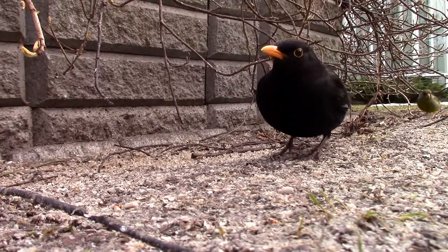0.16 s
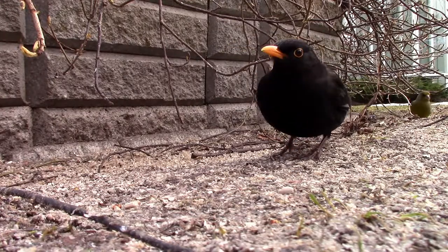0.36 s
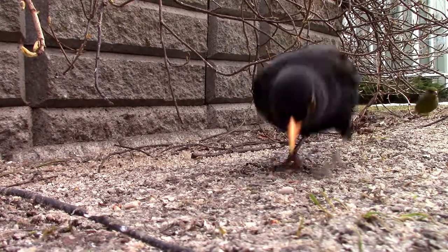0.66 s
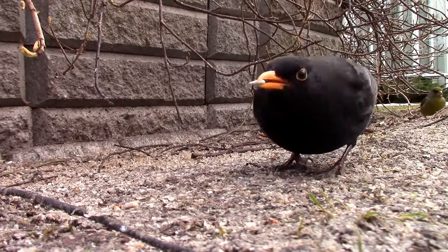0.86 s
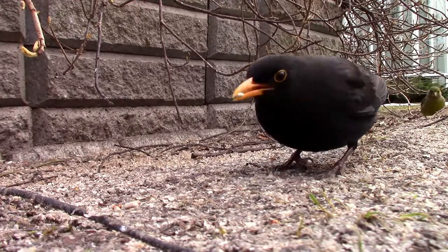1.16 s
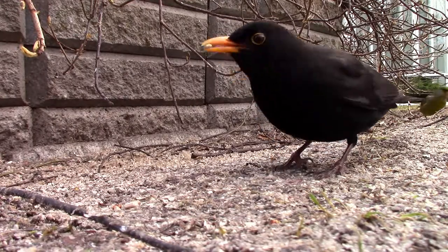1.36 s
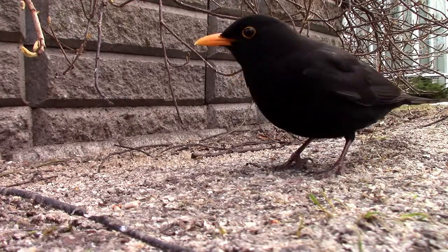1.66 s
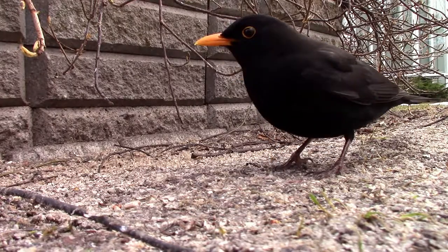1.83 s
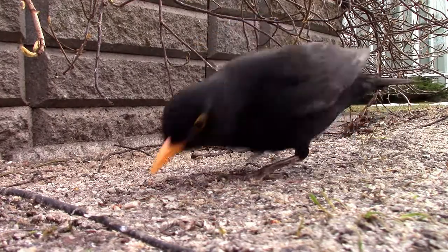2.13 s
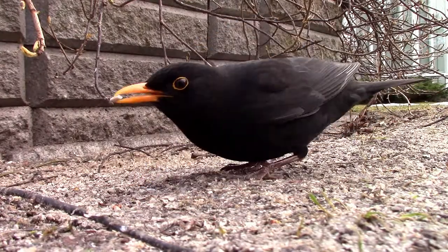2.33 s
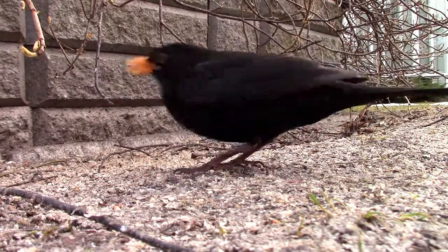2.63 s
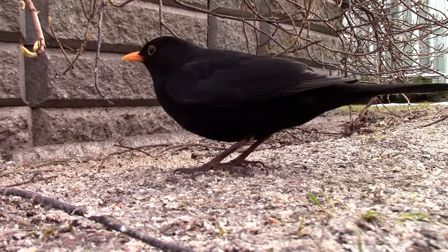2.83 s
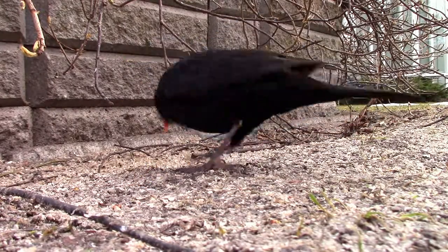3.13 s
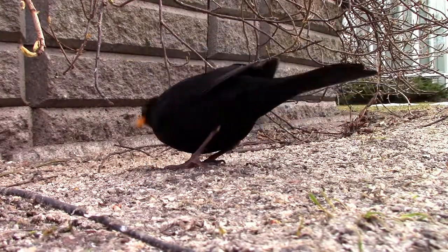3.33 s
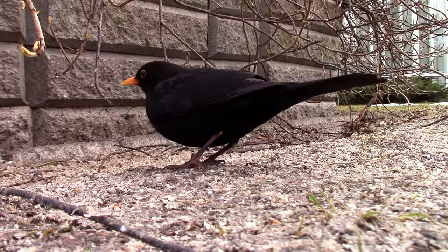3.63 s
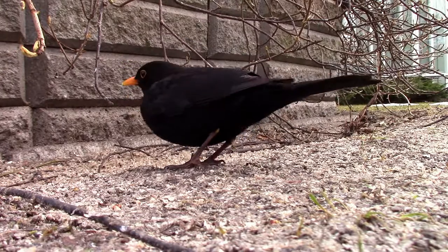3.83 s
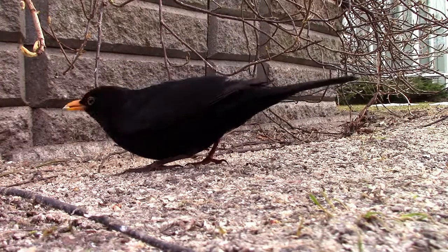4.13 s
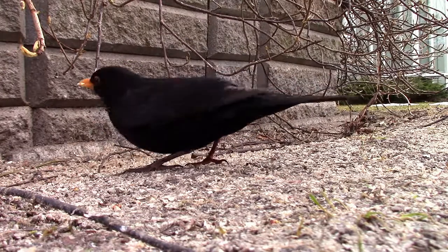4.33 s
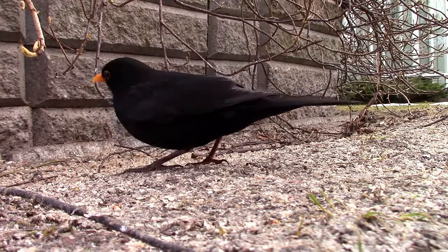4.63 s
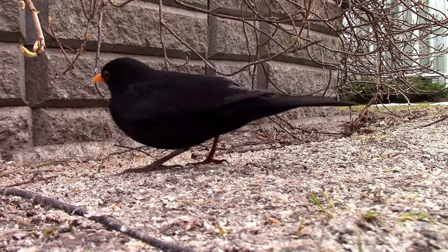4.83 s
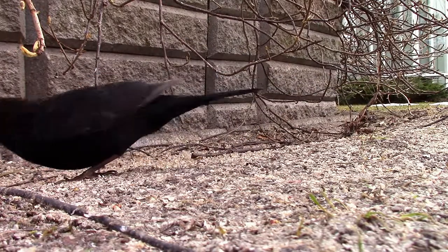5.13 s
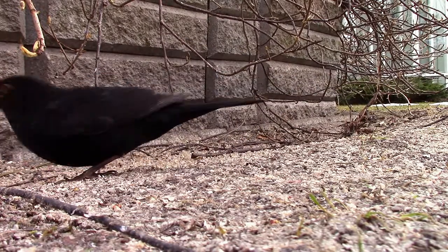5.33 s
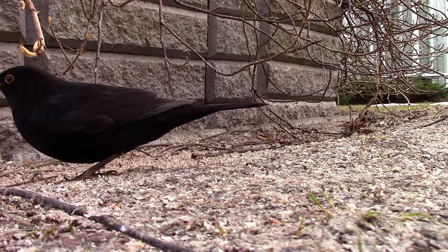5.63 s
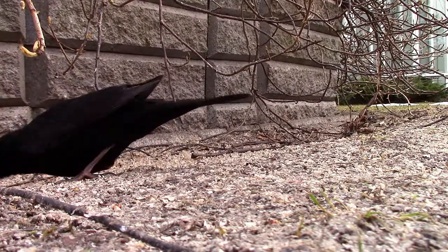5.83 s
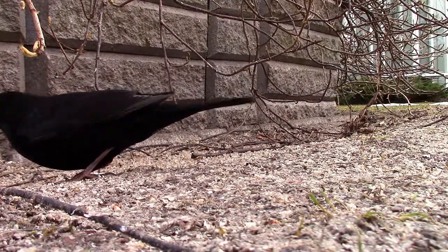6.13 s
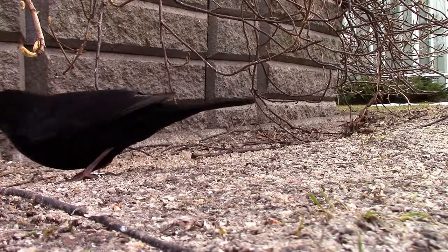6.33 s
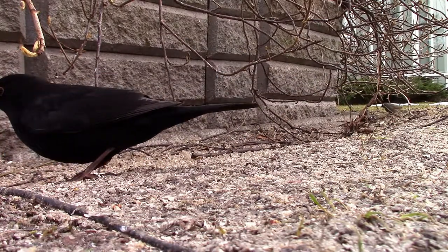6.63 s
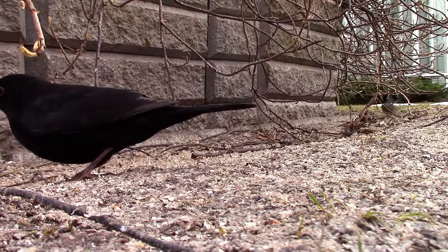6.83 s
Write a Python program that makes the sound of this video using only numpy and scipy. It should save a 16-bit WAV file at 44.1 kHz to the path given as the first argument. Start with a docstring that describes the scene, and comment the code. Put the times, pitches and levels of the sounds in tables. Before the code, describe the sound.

Outdoor yard beside a stone wall, with a close stereo microphone. Dry, hard beak clicks stand out over a quiet low rumble and wavering engine drone. Fast bird song opens, chips and thin whistles follow, and the song briefly returns late. Midway there is a rapid wing flurry, gravel crunches and the sharp snap of a husk; small scuffs, ticks and pecks continue to the end.

```python
"""A blackbird feeds on gravel by a stone wall, close by: beak snaps and pecks are impulses through damped modes.
Grit clicks and crunches are grains of noise ringing the gravel; cracking husks are short bright noise fizzes.
A songbird across the yard sings two phrases, a nearer one chips and trills, others whistle, rasp and chatter
far off: all gliding tones with yard echoes. Out of sight, wings flutter as swishes and puffs of shaped noise.
A distant engine hums as one sine over the resonant noise rumble of a town and an even hiss."""
import sys
import numpy as np
from scipy import signal
from scipy.fft import rfft, irfft, next_fast_len
from scipy.io import wavfile
from scipy.ndimage import uniform_filter1d

SR = 44100
rng = np.random.default_rng(int(sys.argv[2]) if len(sys.argv) > 2 else 0)


def log_audio(samples):
    """Write samples as a 16-bit WAV file to the path given in sys.argv[1]."""
    # one column per channel
    frames = np.atleast_2d(samples).T
    # limit to full scale, then quantise
    limited = np.clip(frames, -1, 1)
    pcm = np.round(limited * 32767).astype(np.int16)
    wavfile.write(sys.argv[1], SR, pcm)


N = 307509
T = np.arange(N) / SR


def undb(db):
    """Decibels to gain."""
    return 10 ** (np.asarray(db) / 20)


def unit(x):
    """Scale to rms 1."""
    return x / np.sqrt(np.mean(x ** 2))


def add(out, s, x):
    """Mix x in at time s."""
    i = max(int(s * SR), 0)
    out[..., i:i + x.shape[-1]] += x[..., :N - i]


def band(x, hz, width):
    """One resonance, gain 1 at its centre; centre and width are capped for the filter."""
    hz = min(hz, SR * .45)
    width = min(width, SR / 4)
    return signal.lfilter(*signal.iirpeak(hz, hz / width, fs=SR), x)


def steep(x, hz, width):
    """The same resonance twice, for steeper skirts."""
    return band(band(x, hz, width), hz, width)


def noise(side_db):
    """Stereo noise with a shared middle and a side at side_db relative to it."""
    mid, side = rng.standard_normal((2, N))
    return mid + undb(side_db) * np.array([side, -side])


def colour(x, points):
    """Shape x by a spectrum of (f/Hz, level/dB) points; rms 1."""
    hz, db = np.transpose(points)
    size = next_fast_len(N, True)
    f = np.fft.rfftfreq(size, 1 / SR)
    gain = undb(np.interp(np.log(f + 1), np.log(hz + 1), db))
    return unit(irfft(rfft(x, size) * gain)[..., :N])


def walk(rate):
    """Smooth random wander of spread near 1, from rate random steps a second."""
    k = int(SR / rate)
    steps = np.repeat(rng.standard_normal(N // k + 1), k)
    return 1.3 * uniform_filter1d(uniform_filter1d(steps, k), k)[:N]


def yard(x, echo_s, echo_db, wet_db, t60):
    """Direct sound, an echo off a house front, and a diffuse tail that falls 60 dB in t60 seconds."""
    t = T[:SR]
    own = rng.standard_normal((2, SR))
    tail = (own + 0.1 * own[::-1]) * undb(-60 * t / t60)
    response = undb(wet_db) * unit(tail) / np.sqrt(SR)
    response[:, int(echo_s * SR)] += undb(echo_db)
    return x + signal.fftconvolve(np.atleast_2d(x), response, axes=1)[:, :N]


def notes(table, arch, waver, edge=.07):
    """Nearly pure tones, each gliding between two pitches along an arch and wavering a little."""
    out = np.zeros(N)
    drift = 1 + waver * walk(700)
    for s, length, first, last, db in table:
        # the fades reach past both ends of the listed length by the share edge
        u = np.linspace(-edge, 1 + edge, int(length * (1 + 2 * edge) * SR))
        glide = first * (last / first) ** u
        bend = 1 + arch * (1 - (2 * u - 1) ** 2)
        hz = glide * bend * np.roll(drift, -int(s * SR))[:len(u)]
        tone = np.sin(2 * np.pi * np.cumsum(hz) / SR)
        add(out, s - edge * length, undb(db) * signal.windows.tukey(len(u), .45) * tone)
    return out


def town(rumble_db=-2.0, air_db=-59):
    """One engine note swells and fades over a low resonant rumble and an even hiss."""
    # engine pitch, sinking slowly: t/s, f/Hz
    hum_pitch = [(0, 110.3), (2.7, 107.2), (6.97, 106.6)]
    # engine loudness: t/s, level/dB
    hum_level = [(0.35, -49.5), (1.12, -37), (2.52, -35.5), (3.75, -48), (4.02, -62), (4.39, -67),
                 (4.66, -46.5), (5.39, -44.5), (5.55, -59.5), (6.29, -45), (6.68, -59), (6.97, -56)]
    # rumble loudness before its trim: t/s, level/dB
    rumble_level = [(0, -49), (2.1, -45), (4.4, -49.5), (6.97, -49)]
    # rumble resonances: f/Hz, width/Hz of each filter pass, level/dB
    rumble_modes = [(83.7, 45.4, -1.5), (138.1, 31, 0.5), (175.6, 22.2, -5), (213.8, 21.8, -8),
                    (243.6, 18.6, -8.5), (282, 104, -15), (455.5, 69, -20)]
    # spectrum of the hiss: f/Hz, relative level/dB
    air_colour = [(30, -7), (150, -6.5), (330, -11.5), (600, -9), (1200, -13.5), (2400, -23), (4200, -20),
                  (6000, -26.5), (15800, -28.5)]
    phase = 2 * np.pi * np.cumsum(np.interp(T, *np.transpose(hum_pitch))) / SR
    hum = np.sqrt(2) * np.sin(phase) * undb(np.interp(T, *np.transpose(hum_level)))
    rumble = 0
    for hz, width, db in rumble_modes:
        # long waves reach both sides alike; shorter ones differ
        side_db = min(-21 + 11 * np.log2(hz / 110), -6)
        rumble = rumble + undb(db) * unit(steep(noise(side_db), hz, width))
    rumble = rumble * undb(np.interp(T, *np.transpose(rumble_level)) + rumble_db)
    air = colour(noise(-2.35), air_colour) * undb(air_db + .5 * walk(3.24))
    return hum + rumble + air


def chatter(chatter_db=-2):
    """Far birds: many quick random chirps, rising or falling, blurred by the yard."""
    # loudness of the far birds before the trim: t/s, level/dB
    chatter_level = [(0, -70.5), (1.05, -55.5), (1.7, -64.5), (3.7, -61.5), (4.35, -57.5), (6.1, -64.5)]
    when, length, pitch, slope = rng.random((900, 4)).T
    start = .02 + when * (T[-1] - .1)
    hz = 1400 * 2 ** (1.4 * pitch)
    glide = 0.2 * (slope - .6)
    calls = np.transpose([start, .015 + .02 * length, hz * (1 - glide), hz * (1 + glide), 0 * hz])
    blur = yard(notes(calls, arch=0, waver=0.021), echo_s=0.03, echo_db=-12.0, wet_db=3, t60=0.8)
    return unit(blur) * undb(np.interp(T, *np.transpose(chatter_level)) + chatter_db)


def beak(table, knock_db, rattle_db, rattle_s, sparkle_db, edge_db, hollow_db=-15, ring_db=-19,
         lead_s=0.001194, lift_db=1.0):
    """Each blow is one sharp impulse and a brief rattle, ringing heavily damped resonances."""
    # modes of a blow: knock, hollow of the beak, edge, sparkle: f/Hz, width/Hz (band caps the widest)
    beak_modes = [(1200, 890), (3200, 1900), (7700, 4800), (12500, 22300)]
    out, t = np.zeros((2, N)), T[:1024]
    tick = (t == 0) * 1.
    for s, db, hz, bright in table:
        shares = undb([knock_db, hollow_db, bright + edge_db, bright + sparkle_db])
        ring = sum(share * unit(steep(tick, *mode)) for share, mode in zip(shares, beak_modes))
        ring = ring + undb(ring_db) * unit(steep(tick, hz, 1080))
        shared, left, right = rng.standard_normal((3, len(t)))
        rattle = shared + 3.2 * np.array([left, right])
        rattle = rattle * (1 - np.exp(-t / 0.00041)) * np.exp(-t / rattle_s)
        force = tick + undb(rattle_db) * unit(rattle) / np.sqrt(len(t))
        blow = signal.fftconvolve(force, ring[None] / abs(ring).max(), axes=1)
        add(out, s + lead_s, undb(db + lift_db) * blow)
    return yard(out, echo_s=0.023, echo_db=-30.0, wet_db=-27.5, t60=0.11)


def feeding():
    """Snaps in the air are dry and clean; pecks at the gravel knock and rattle more strongly."""
    # beak snapping shut, before beak's lead and lift: t/s, level/dB, ring f/Hz, brightness level/dB
    snap_table = [(0.0198, -29.5, 2750, -18.5), (0.0449, -11, 3080, -16), (0.1986, -32, 2670, -36),
                  (1.2606, -24, 3580, -20), (1.2638, -22, 2950, -18.5), (1.6295, -27, 3350, -19),
                  (1.699, -30, 3550, -14.5), (2.3731, -21.5, 2850, -16.5), (2.6204, -22.5, 2900, -4),
                  (2.6228, -25, 3960, -54), (3.6195, -29.5, 3000, -13), (3.6262, -20, 3430, -13),
                  (4.1815, -36, 3600, -36), (4.1888, -29, 3770, -18), (4.1999, -10.5, 3100, -10.5),
                  (4.3969, -35.5, 2510, -26), (5.2225, -23, 2540, -21), (6.0538, -26.5, 2630, -17.5),
                  (6.2619, -32.5, 3640, -24)]
    # beak striking the gravel, before beak's lead and lift: t/s, level/dB, ring f/Hz, brightness level/dB
    peck_table = [(0.9011, -24, 2660, -24), (3.432, -25.5, 2945, -20), (5.0613, -35.5, 2720, -21.5),
                  (5.4516, -31.5, 2400, -16), (6.3303, -31.5, 3850, -22)]
    snaps = beak(snap_table, knock_db=-27.5, rattle_db=-7.5, rattle_s=0.0021, sparkle_db=-4.5, edge_db=2.0)
    pecks = beak(peck_table, knock_db=-20.0, rattle_db=-0.5, rattle_s=0.0019, sparkle_db=1, edge_db=3)
    return snaps + pecks


def syllables(shape, table):
    """The notes of one kind of syllable, sung at each row's time, pitch and strength."""
    sung = []
    for s, hz, db in table:
        for delay, length, first, last, accent in shape:
            sung.append((s + delay, length, hz * first, hz * last, db + accent))
    return sung


def singer(song_db=-2, buzz_db=-4):
    """The song comes round the wall by many short paths, which smear its notes, and lingers in the yard."""
    # notes of the two kinds of syllable: delay/s, length/s, first and last share of the row's pitch, accent/dB
    tumble_shape = [(-.015, .015, 1.42, 1.26, -14.5), (0, 0.034, 0.98, 0.84, 0.5),
                    (.036, .026, .84, .75, -3)]
    peak_shape = [(0, 0.0293, .77, 1, 0), (.029, .02, .98, .63, -1)]
    # when each kind is sung: t/s, reference f/Hz, level/dB
    tumbles_sung = [(.064, 4250, -53.5), (0.225, 3980, -49.5), (0.381, 3850, -50.5), (.534, 3830, -49.5)]
    peaks_sung = [(.728, 4100, -49), (.925, 4100, -46.5), (4.711, 3800, -53.5), (4.772, 4000, -50),
                  (4.955, 3750, -50.5)]
    # single quick notes between them: t/s, first f/Hz, last f/Hz, level/dB
    twitters = [(.483, 3422, 4500, -52.5), (.634, 3280, 4440, -55), (.675, 3720, 2400, -51),
                (1.068, 4450, 5800, -57), (4.23, 3200, 2810, -50), (4.266, 4160, 3280, -52),
                (4.403, 3810, 3430, -55), (4.441, 2970, 3720, -54), (4.559, 2960, 4070, -49)]
    # long buzzy sweeps: t/s, length/s, first f/Hz, last f/Hz, level/dB
    buzzes = [(1.112, .112, 5764, 2646, -46.5), (1.32, 0.066, 2510, 4200, -49.5),
              (1.383, 0.046, 4240, 3200, -48), (5.155, 0.12, 5000, 2390, -52),
              (5.35, 0.056, 2640, 4140, -53), (5.405, 0.051, 4030, 3140, -52.5)]
    # low, hoarse notes under the first phrase: t/s, length/s, first f/Hz, last f/Hz, level/dB
    chuckles = [(.852, .02, 2650, 2540, -51), (0.872, 0.21, 1660, 1526, -54),
                (1.003, 0.036, 2800, 2650, -54)]
    twitter_s = 0.015
    song = syllables(tumble_shape, tumbles_sung) + syllables(peak_shape, peaks_sung)
    song = song + [(s, twitter_s, *note) for s, *note in twitters]
    # a negative arch lets each clear note dip below its even glide halfway through
    clear = undb(song_db) * notes(song, arch=-0.041, waver=.02)
    # a strong shake of the pitch makes the buzz
    rough = undb(buzz_db) * notes(buzzes + chuckles, arch=0, waver=0.052)
    paths = yard(clear, echo_s=.009, echo_db=-9, wet_db=-3, t60=.11)
    paths = paths + yard(rough, echo_s=.012, echo_db=-6, wet_db=0, t60=.13)
    return yard(paths, echo_s=.038, echo_db=-15, wet_db=-7, t60=.8)


def grit():
    """Tiny stones click against each other: in clusters at each scuff, and singly in between."""
    # grit shifting under feet and beak, before the ring: t/s, length/s, level/dB
    scuffs = [(1.607, 0.019, -58), (2.667, 0.0033, -54.5), (3.4262, 0.005, -48.5), (5.443, 0.028, -55),
              (6.264, 0.0053, -49)]
    # one small stone on another, before the ring: t/s, level/dB
    clicks = [(.369, -35.5), (3.6775, -31.5), (4.5017, -37), (4.5575, -34), (5.9429, -36), (6.04, -34)]
    out = np.zeros(N)
    for s, length, db in scuffs:
        n = int(length * SR)
        grains = rng.standard_normal(n) * undb(5 * np.minimum(rng.exponential(size=n), 4))
        add(out, s, undb(db) * unit(grains * np.hanning(n)))
    for s, db in clicks:
        add(out, s, undb([db]))
    return 2.9 * steep(out, 3050, 3800) + 1.8 * steep(out, 5500, 12000)


def crunches(grain_db=6, rise_s=0.0019):
    """Dull crunches, as of steps: each presses a burst of uneven grains that ring the gravel bed."""
    # crunches before the ring: t/s, level/dB
    steps = [(0.821, -52), (3.937, -53), (3.982, -51), (4.146, -47), (4.181, -48), (4.229, -49),
             (5.062, -50), (5.316, -49), (5.474, -49.5), (5.51, -42.5), (5.624, -50)]
    # resonances of the gravel bed: f/Hz, width/Hz of each filter pass, level/dB
    bed_modes = [(910, 690, 3), (1430, 500, 0.5), (3200, 4000, -6)]
    out, t = np.zeros(N), T[:SR // 10]
    for s, db in steps:
        unevenness = np.minimum(rng.exponential(size=len(t)), 4)
        grains = unit(rng.standard_normal(len(t)) * undb(grain_db * unevenness))
        add(out, s, undb(db) * grains * t / rise_s * np.exp(1 - t / rise_s))
    # narrow modes are lifted, as they pass less of the noise
    return sum(undb(db) * np.sqrt(SR / 2 / width) * steep(out, hz, width) for hz, width, db in bed_modes)


def near_bird(count=5):
    """Slurs, chips, loops and arches, close and fairly dry, and a quick sinking trill of merging notes."""
    # slurs: t/s, length/s, first f/Hz, last f/Hz, level/dB
    slurs = [(2.32, 0.043, 2300, 2520, -54.5), (3.57, 0.032, 4250, 5200, -53.5),
             (3.978, 0.04, 4680, 3340, -44.5), (4.016, 0.039, 3350, 3010, -42),
             (5.628, 0.039, 4050, 4780, -60.5), (5.664, 0.079, 4860, 4590, -55),
             (5.712, 0.15, 4600, 3975, -46.5)]
    # short falling chips: t/s, level/dB; their note: length/s, first f/Hz, last f/Hz
    chip_table = [(3.088, -53), (3.162, -43), (3.251, -43), (4.073, -53)]
    chip_note = (0.0163, 3650, 3180)
    # quick up-and-down loops: t/s, level/dB; their note: length/s, first f/Hz, last f/Hz
    loop_table = [(3.33, -59.5), (3.458, -56), (3.599, -51), (3.739, -51), (3.88, -54.5)]
    loop_note = (0.02, 3400, 3350)
    # lower, slower arches: t/s, level/dB; their note: length/s, first f/Hz, last f/Hz
    arch_table = [(4.472, -61), (4.59, -58), (4.706, -59)]
    arch_note = (.044, 2100, 1800)
    # first rising note of the trill: length/s, first f/Hz, last f/Hz
    trill_note = (0.024, 4100, 5200)
    trill_s, step_s, trill_db = 3.752, 0.027, -52.5
    sink_hz = 82  # each trill note starts and ends this much lower
    chips = [(s, *chip_note, db) for s, db in chip_table]
    loops = [(s, *loop_note, db) for s, db in loop_table]
    loops = loops + [(s, *arch_note, db) for s, db in arch_table]
    length, first, last = trill_note
    run = [(trill_s + k * step_s, length, first - k * sink_hz, last - k * sink_hz, trill_db)
           for k in range(count)]
    trill = yard(notes(run, arch=.025, waver=.014), echo_s=.013, echo_db=-12, wet_db=-7, t60=.4)
    voice = notes(slurs, arch=-0.0167, waver=0.0051)
    voice = voice + notes(chips, arch=0.028, waver=0.019)
    voice = voice + notes(loops, arch=0.33, waver=0.0063) + trill
    return yard(voice, echo_s=.024, echo_db=-14, wet_db=-10, t60=.8)


def whistlers():
    """Whistles from far off, each a shallow arch and some two-voiced, that linger in the yard."""
    # whistles: t/s, length/s, first f/Hz, last f/Hz, level/dB
    whistles = [(2.869, 0.089, 1927, 1950, -56.5), (2.97, 0.056, 2010, 2170, -60),
                (2.966, 0.064, 3200, 3340, -58.5), (3.108, 0.086, 1952, 1907, -57),
                (3.331, 0.063, 2036, 1880, -57), (3.59, 0.11, 4036, 4200, -51),
                (3.91, 0.062, 2130, 1975, -58), (4.325, 0.14, 2270, 2180, -57),
                (5.125, 0.15, 1950, 2125, -57), (6.13, 0.084, 2130, 2145, -61),
                (6.134, 0.074, 2610, 2590, -62), (6.33, 0.082, 4030, 4090, -68),
                (6.58, 0.1, 2180, 2094, -56), (6.575, 0.1, 2880, 2590, -59.5)]
    voice = notes(whistles, arch=0.0128, waver=.007)
    return yard(voice, echo_s=.088, echo_db=-12, wet_db=-4, t60=1.3)


def rasps():
    """Short harsh calls whose pitch shakes so widely that they turn to a rasp."""
    # harsh calls: t/s, length/s, centre f/Hz, level/dB
    rasp_table = [(2.876, 0.057, 4160, -57.5), (6.731, 0.055, 3700, -58)]
    calls = [(s, length, hz, hz, db) for s, length, hz, db in rasp_table]
    return yard(notes(calls, arch=0, waver=.17), echo_s=.009, echo_db=-5, wet_db=-4, t60=.25)


def wings(rush_db=-8, puff_s=0.04):
    """Each stroke swishes through the feathers and puffs at the microphone; long strokes move more air."""
    # wing strokes before the swish and puff gains: t/s, level/dB, rise/s
    strokes = [(3.93, -44.5, 0.032), (4.088, -39.5, 0.016), (4.131, -36, 0.016), (4.172, -36.5, 0.014),
               (4.209, -43.5, 0.032), (5.494, -42, 0.016), (5.609, -45, 0.027), (5.92, -48.5, 0.035)]
    # spectrum of the feathers: f/Hz, relative level/dB
    feather_colour = [(200, -13), (500, -4), (870, 0), (1650, -3.5), (3000, -9.5), (6000, -20.5),
                      (15000, -22)]
    rush, push, t = np.zeros(N), np.zeros(N), T[:SR // 4]
    for s, db, rise_s in strokes:
        stroke = undb(db) * t / rise_s * np.exp(1 - t / rise_s)
        # overlapping swishes add their powers
        add(rush, s, stroke ** 2)
        # a stroke that rises in puff_s has equal swish and puff envelopes, before the rush gain
        add(push, s, stroke * rise_s / puff_s)
    # the feathers flick past one another in small, uneven rustles
    rustle = undb(3.5 * walk(600) + 2.5 * walk(130))
    feathers = colour(noise(-9) * rustle, feather_colour)
    swish = yard(undb(rush_db) * np.sqrt(rush) * feathers, echo_s=.02, echo_db=-15, wet_db=-10, t60=.45)
    return swish + push * unit(steep(noise(-30), 71, 70))


def cracks(decay_s=0.0034):
    """A husk cracks in the beak: a few milliseconds of thin, bright, fizzing splinters that die away."""
    # husk cracks: t/s, level/dB
    crack_table = [(4.2008, -29), (4.3966, -35)]
    # spectrum of the fizz: f/Hz, relative level/dB
    crack_colour = [(1000, -25), (2400, 5), (5500, -31), (9000, -4), (16000, -2.5)]
    level, t = np.zeros(N), T[:SR]
    for s, db in crack_table:
        add(level, s, undb(db) * np.exp(-t / decay_s))
    return level * colour(noise(0), crack_colour)


def scene():
    """The blackbird and the yard around it."""
    blackbird = feeding() + cracks()
    gravel = grit() + crunches()
    birds = singer() + near_bird() + whistlers() + rasps() + chatter()
    return blackbird + gravel + wings() + birds + town()


def record(dry, top_hz=16100):
    """A resonance in the left port turns the phase of the treble, and that side is a little hollow; the top is cut."""
    left = dry[0] - 2 * band(dry[0], 9310, 4700) - 0.099 * band(dry[0], 1130, 2800)
    top_cut = signal.ellip(8, .2, 70, top_hz, fs=SR, output="sos")
    return signal.sosfilt(top_cut, np.array([left, dry[1]]))


dry = scene()
out = record(dry)
log_audio(out)
```